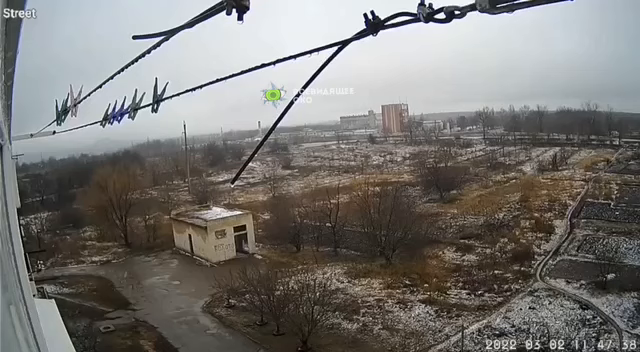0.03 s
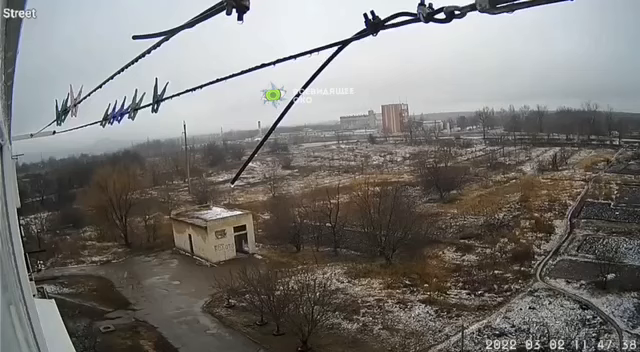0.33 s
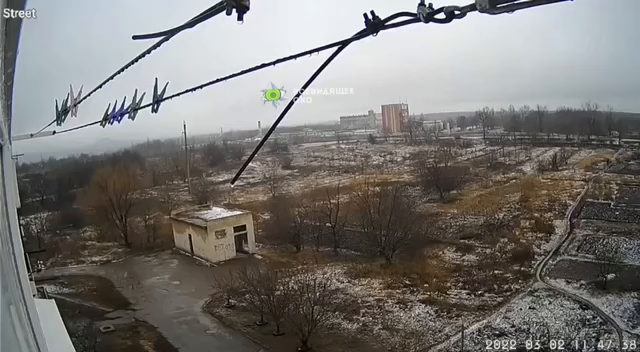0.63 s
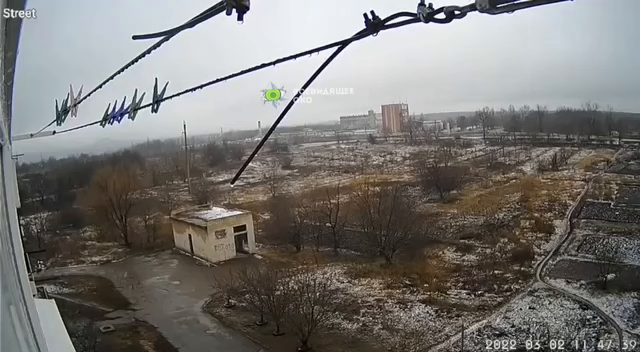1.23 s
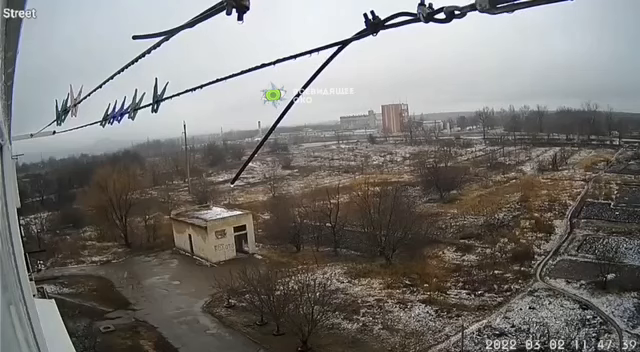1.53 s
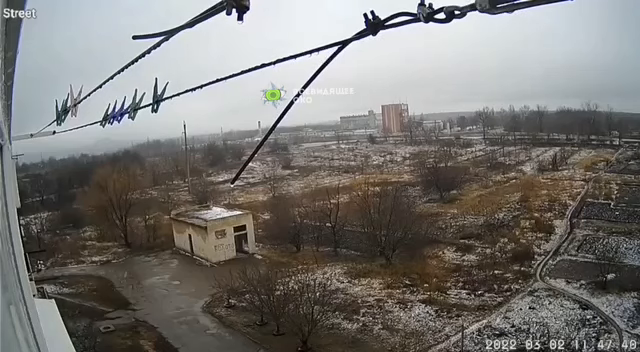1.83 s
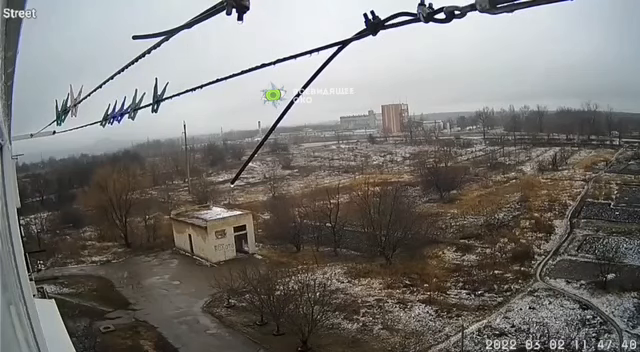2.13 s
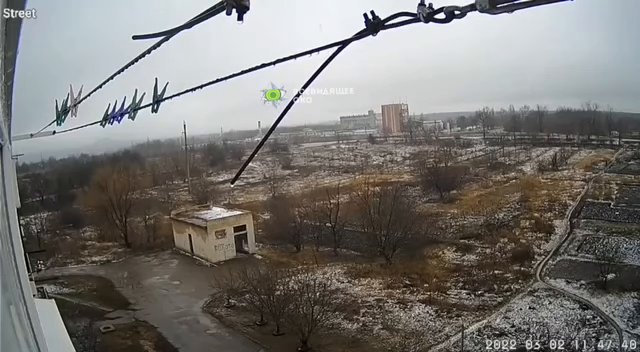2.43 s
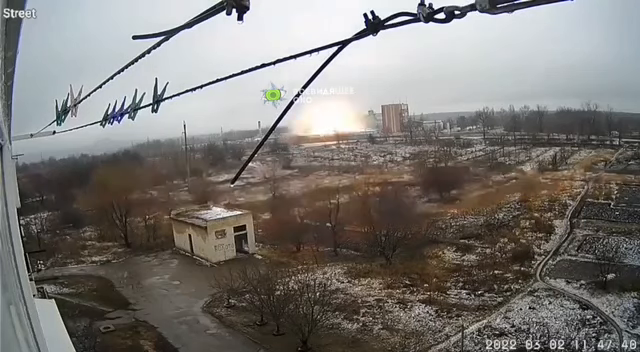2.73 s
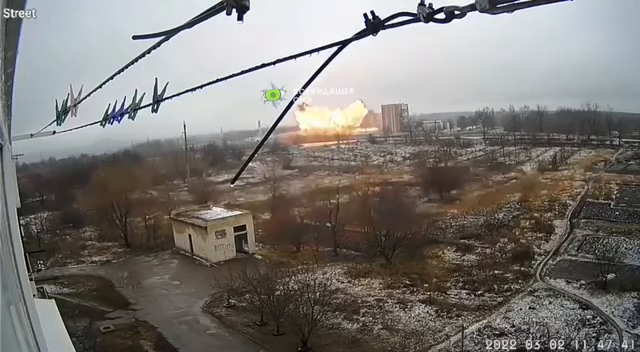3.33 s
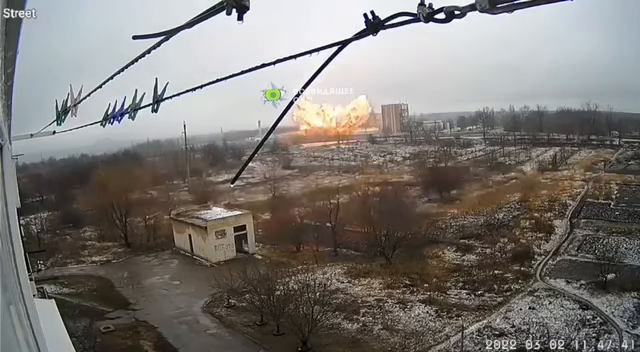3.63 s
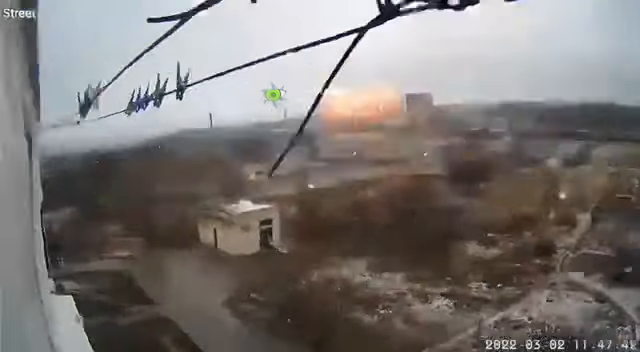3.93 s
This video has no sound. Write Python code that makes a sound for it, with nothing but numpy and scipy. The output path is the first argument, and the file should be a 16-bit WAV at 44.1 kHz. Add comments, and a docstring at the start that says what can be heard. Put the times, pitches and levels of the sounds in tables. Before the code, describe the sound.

A very loud, distorted explosion breaks in after quiet knocks and wind bumping the microphone.

```python
"""A few sharp, hollow knocks on a windy balcony, over faint hiss, while gusts bump a small camera's mic.
Then the blast of a big explosion arrives: a shock front, a tearing roar and a swelling rumble.
Knocks, roar and rumble are shaped noise, coloured by the balcony's resonances.
The blast overloads the camera's narrow-band sound input."""
import sys
import numpy as np
from scipy import signal
from scipy.fft import rfft, irfft
from scipy.io import wavfile
from scipy.ndimage import uniform_filter1d

SR = 44100
rng = np.random.default_rng(int(sys.argv[2]) if len(sys.argv) > 2 else 0)


def master(y):
    """Save y as 16-bit WAV."""
    cut = np.clip(np.atleast_2d(y).T, -1, 1)
    pcm = np.round(cut * 32767)  # scale
    wavfile.write(sys.argv[1], SR, pcm.astype(np.int16))


N = 176400
T, HZ = np.arange(N) / SR, np.fft.rfftfreq(N, 1 / SR)
BAND_HZ = 3480


def blast():
    """Shock front, ragged roar, then rumble and a deep pressure surge; levels before the overload."""
    # roar spectrum: freq_hz, relative_db
    roar_spectrum = [(30, -29), (150, -13), (400, -8), (720, .5), (870, -2), (1050, -1.5), (1350, -6),
                     (1700, -7.5), (2300, -6), (2800, -7.5), (3400, -5)]
    # roar envelope: time_s, level_db
    roar_envelope = [(3.62, -1.5), (3.68, 0), (3.725, -2), (3.76, -5), (3.79, -4), (3.835, -3),
                     (3.87, -4.5), (3.925, -3), (4.0, -5.5)]
    # rumble spectrum: freq_hz, relative_db
    rumble_spectrum = [(20, -8), (55, -1.5), (130, -1.5), (220, -4.5), (360, -3.5), (600, -15), (1200, -54),
                       (3400, -37)]
    # rumble envelope: time_s, level_db
    rumble_envelope = [(3.62, -26), (3.722, -14), (3.738, 0), (3.76, -2.5), (3.79, -6), (3.83, -3.5),
                       (3.865, 1.5), (3.92, -4.5), (3.96, -0.5), (4.0, 1)]
    arrival_s, overpressure_s, shock_db = 3.6202, 0.00062, 4
    roar_rise_s, rough_db = 0.0041, 2
    surge_start_s, surge_rise_s, surge_db = 3.93, 0.021, 2
    age_s, space = np.maximum(T - arrival_s, 0), balcony()
    shock = amp(shock_db) * (age_s / overpressure_s - 1) * np.exp(-age_s / overpressure_s)
    roar_gain = envelope(roar_envelope) * amp(rough_db * noise(HZ < 200))
    roar = (1 - np.exp(-age_s / roar_rise_s)) * roar_gain * noise(colour(roar_spectrum) * space)
    rumble = envelope(rumble_envelope) * noise(colour(rumble_spectrum) * space)
    surge = amp(surge_db) * np.clip((T - surge_start_s) / surge_rise_s, 0, 1) * eddies(edge_hz=62)
    return (T >= arrival_s) * (shock + roar + rumble + surge)


def knocks():
    """Each knock: a fast-dying crack with its own resonances, over a hollow body that rings on."""
    # knocks: start_s, rise_s, body_db, crack_db, ring_hz
    hits = [(0.047, 0.0031, -37.5, -55.5, 404), (0.215, 0.011, -33, -37.5, 734),
            (0.435, 0.01, -30, -30, 440), (1.758, 0.012, -42, -36.5, 597),
            (3.055, 0.0035, -33.5, -29.5, 510), (3.425, 0.025, -52.5, -41, 500)]
    # hollow body spectrum: freq_hz, relative_db
    body_spectrum = [(60, -22), (200, -5.5), (300, 1.5), (450, 2), (580, -1.5), (740, 2), (950, -14),
                     (1400, -22.5), (3400, -46)]
    # crack spectrum: freq_hz, relative_db
    crack_spectrum = [(200, -40), (600, -4), (1150, 0.5), (1400, -3.5), (1900, 5.5), (2300, -2.5),
                      (2600, 1.5), (3400, -7)]
    hold_s, body_t60_s, crack_t60_s = 0.012, 0.39, 0.13
    ring_db, ring_width_hz, ripple_db, ripple_s = 7.5, 70, 3.5, 0.007
    out, space = np.zeros(N), balcony()
    for start_s, rise_s, body_db, crack_db, ring_hz in hits:
        attack = np.clip((T - start_s) / rise_s, 0, 1)
        age_s = np.maximum(T - start_s - rise_s - hold_s, 0)
        ripple = unit(rfft(rng.standard_normal(N) * (T < ripple_s)).real)  # random spectral peaks
        body = colour(body_spectrum) * amp(ring_db * resonance(ring_hz, ring_width_hz))
        crack = colour(crack_spectrum) * amp(ripple_db * ripple)
        for spectrum, level_db, t60_s in (body, body_db, body_t60_s), (crack, crack_db, crack_t60_s):
            out += attack * amp(level_db - 60 * age_s / t60_s) * noise(spectrum * space)
    return out


def wind():
    """Each gust: a short swell of eddies on the mic, with a trace of hiss."""
    # gusts: centre_s, length_s, level_db, edge_hz
    gusts = [(.15, 0.054, -40, 90), (0.283, 0.052, -29, 133), (0.376, 0.087, -31, 60.7),
             (0.46, 0.089, -28.5, 92), (0.567, 0.019, -27.5, 120), (0.608, 0.035, -20.5, 184),
             (0.636, 0.05, -28.5, 90), (.708, 0.0071, -27, 192), (0.729, 0.046, -37.5, 112.4),
             (.826, 0.0079, -25, 234), (0.838, 0.024, -25, 139), (0.876, 0.027, -23, 133),
             (0.992, 0.075, -42, 102), (1.441, 0.032, -35, 115), (1.509, 0.037, -28.5, 100),
             (1.784, 0.051, -39, 95), (1.87, 0.03, -32, 61), (1.955, 0.049, -40, 95),
             (2.082, 0.11, -41.5, 120), (2.157, 0.031, -37.5, 102), (2.27, 0.1, -45, 114),
             (2.403, 0.032, -24.5, 130), (2.439, 0.027, -29.5, 120), (2.492, 0.036, -32.5, 99),
             (2.68, 0.016, -30.5, 225), (2.719, 0.036, -23, 98), (2.915, 0.08, -42.5, 50)]
    squareness, rustle_relative_db = 2.2, -38.5
    rustle = amp(rustle_relative_db) * noise(HZ < BAND_HZ)
    out = np.zeros(N)
    for centre_s, length_s, level_db, edge_hz in gusts:
        swell = np.exp(-abs(1.62 * (T - centre_s) / length_s) ** squareness)
        out += amp(level_db) * swell * (eddies(edge_hz) + rustle)
    return out


def eddies(edge_hz):
    """Low pressure swings of fairly even strength, rolled off above edge_hz."""
    low_hz, steepness, evenness = 25.9, 4.69, 0.56
    spectrum = (HZ / (HZ + low_hz)) ** 2 / (1 + (HZ / edge_hz) ** steepness)
    swing = signal.hilbert(noise(spectrum))
    power = uniform_filter1d(abs(swing) ** 2, size=700)
    return unit(swing.real / power ** (evenness / 2))


def air():
    """Faint outdoor hiss with drifting patches and slow swells."""
    # hiss spectrum: freq_hz, relative_db
    hiss_spectrum = [(20, 1.5), (50, -1), (90, -8), (170, -13), (340, -16.5), (700, -17), (1150, -15),
                     (1400, -18), (1850, -19.5), (2300, -24), (3300, -25)]
    # hiss envelope: time_s, level_db
    hiss_envelope = [(0, -65), (.55, -57.5), (.62, -58.5), (.77, -57.5), (.9, -57), (1.12, -54), (1.3, -53),
                     (1.42, -59.5), (1.68, -54), (2.02, -53), (2.36, -56), (2.7, -53.5), (3.0, -57),
                     (3.25, -53.5), (3.47, -54.5), (3.54, -64.5)]
    patch_db = 3
    freq_hz, _, frames = signal.stft(rng.standard_normal(N), SR, nperseg=1024, noverlap=768)
    patches = uniform_filter1d(rng.standard_normal(frames.shape), size=7, axis=0)
    patches = unit(uniform_filter1d(patches, size=14, axis=1))
    frames = frames * colour(hiss_spectrum, freq_hz)[:, None] * amp(patch_db * patches)
    hiss = signal.istft(frames, nperseg=1024, noverlap=768)[1][:N]
    return unit(lowpass(hiss, BAND_HZ)) * envelope(hiss_envelope)


def tones():
    """Faint wavering tones of narrow-band noise that come and go."""
    # tone swells: centre_s, length_s, pitch_hz, level_db
    swells = [(1.044, 0.13, 439, -56), (2.82, .04, 1884, -60), (2.98, 0.047, 1895, -57),
              (3.57, 0.015, 1895, -56)]
    width_hz = 35
    out = np.zeros(N)
    for centre_s, length_s, pitch_hz, level_db in swells:
        swell = np.exp(-2 * ((T - centre_s) / length_s) ** 2)
        out += amp(level_db) * swell * noise(np.exp(-((HZ - pitch_hz) / width_hz) ** 2))
    return out


def balcony():
    """Spectral gain of the resonances between the balcony's walls, cut at BAND_HZ."""
    # wall resonances: centre_hz, width_hz, lift_db
    modes = [(122, 19, 8.5), (212, 32, 3), (301.5, 21, 3.5), (355.6, 15, 6.5), (466.8, 39, 7),
             (584.5, 33, 7.5), (699, 33, 3.5), (786.7, 31, 6.5), (1025, 35.7, 5), (1303, 30, 5.5),
             (1554, 44, 5), (1868, 49, 4.5), (2330, 20, 3.5), (2895, 23, 1.5)]
    gain_db = sum(lift_db * resonance(centre_hz, width_hz) for centre_hz, width_hz, lift_db in modes)
    return amp(gain_db) * (HZ < BAND_HZ)


def resonance(centre_hz, width_hz):
    """Spectral peak of height 1."""
    return 1 / (1 + (2 * (HZ - centre_hz) / width_hz) ** 2)


def amp(db):
    """Decibels to gain."""
    return 10 ** (np.asarray(db) / 20)


def unit(x):
    """Scale to rms 1."""
    return x / np.sqrt(np.mean(x ** 2) + 1e-20)


def envelope(points):
    """Gain per sample from a level table."""
    return amp(np.interp(T, *np.transpose(points)))


def colour(points, hz=HZ):
    """Gain per frequency from a spectrum table."""
    freq_hz, gain_db = np.transpose(points)
    return amp(np.interp(np.log(hz + 1), np.log(freq_hz), gain_db))


def noise(spectrum):
    """Shaped noise, rms 1."""
    return unit(irfft(rfft(rng.standard_normal(N)) * spectrum, N))


def lowpass(x, hz):
    """Steep low-pass."""
    return signal.oaconvolve(x, signal.firwin(601, hz, window=("kaiser", 8), fs=SR), "same")


def scene():
    """Mono sum at the mic."""
    return (air() + tones() + wind() + knocks() + blast())[None]


def record(dry):
    """The input saturates and is cut to a telephone band; a later stage hard-clips the peaks."""
    input_limit, makeup_db, output_limit, edge_hz = 0.68, 0.78, 0.7, 15900
    saturated = input_limit * np.tanh(dry[0] / input_limit)
    narrow = amp(makeup_db) * lowpass(saturated, BAND_HZ)
    return lowpass(np.clip(narrow, -output_limit, output_limit), edge_hz)[None]


dry = scene()
out = record(dry)
master(out)
```